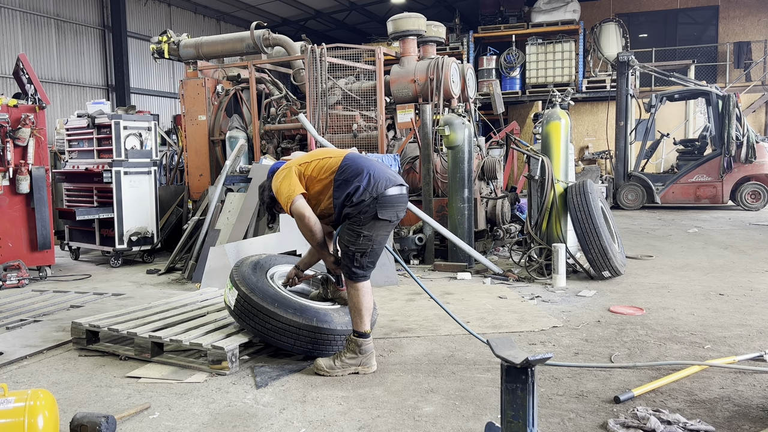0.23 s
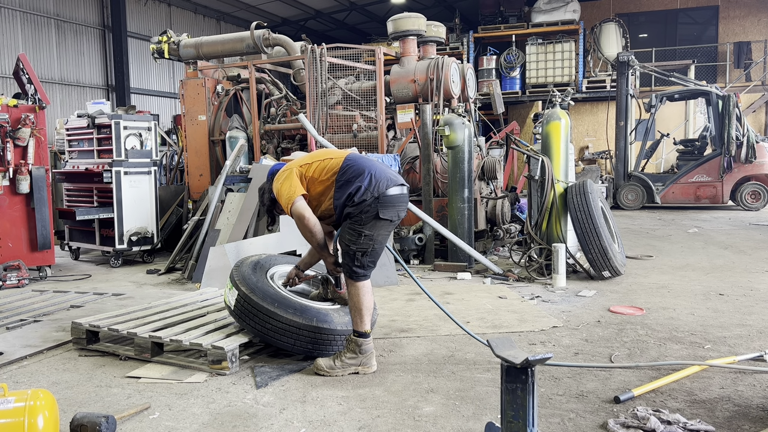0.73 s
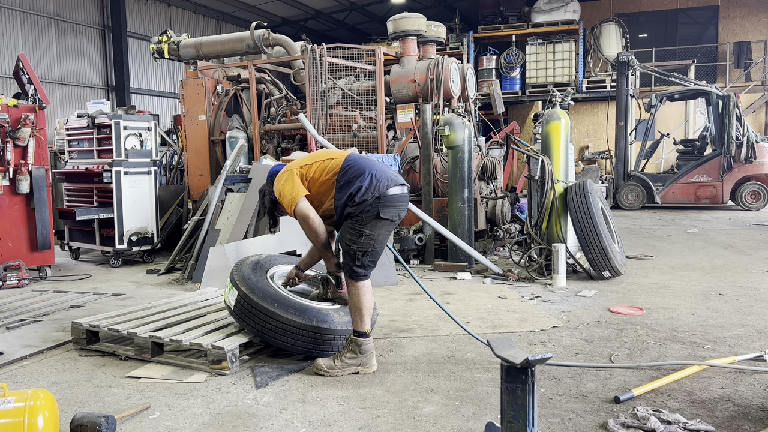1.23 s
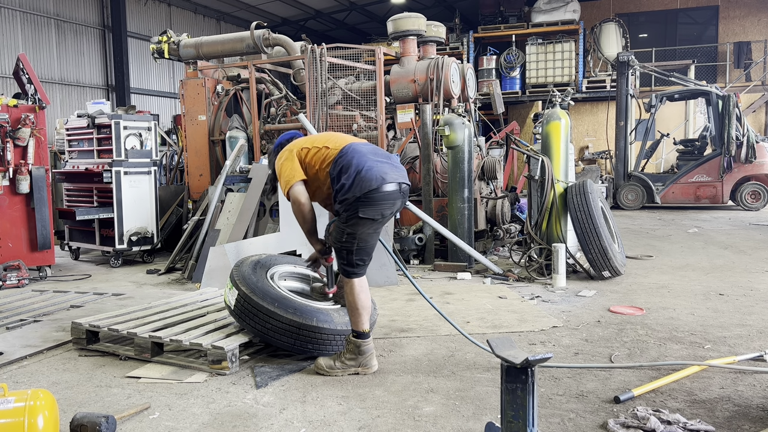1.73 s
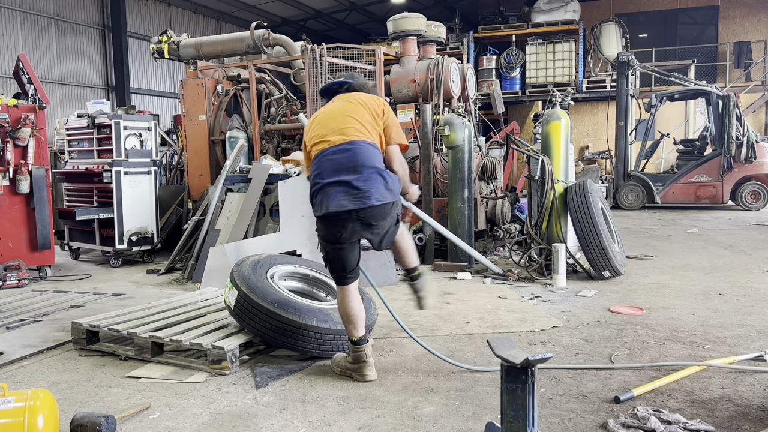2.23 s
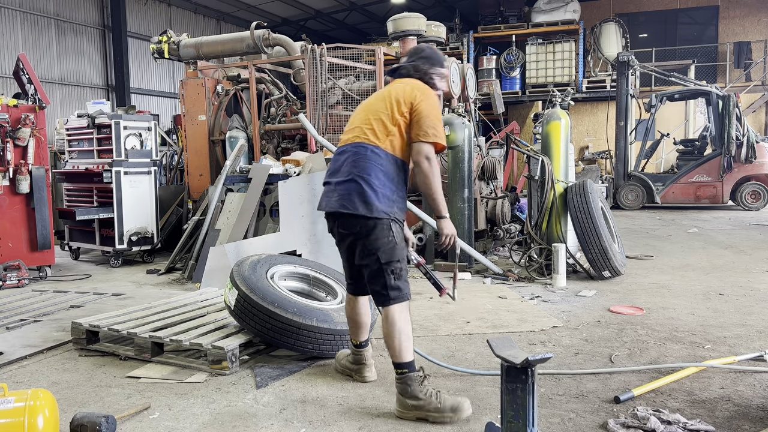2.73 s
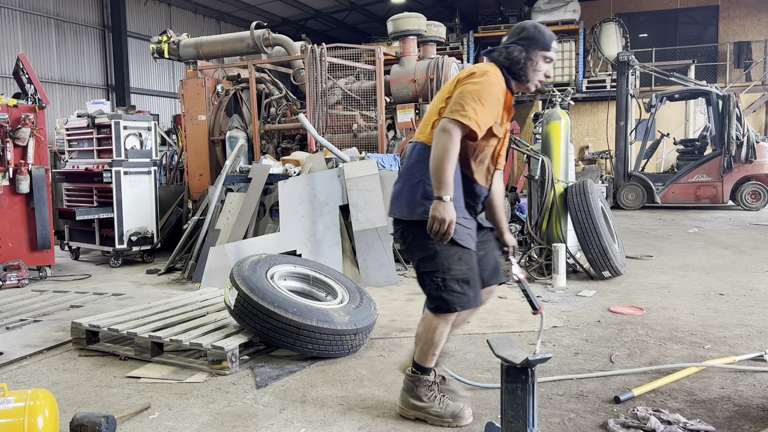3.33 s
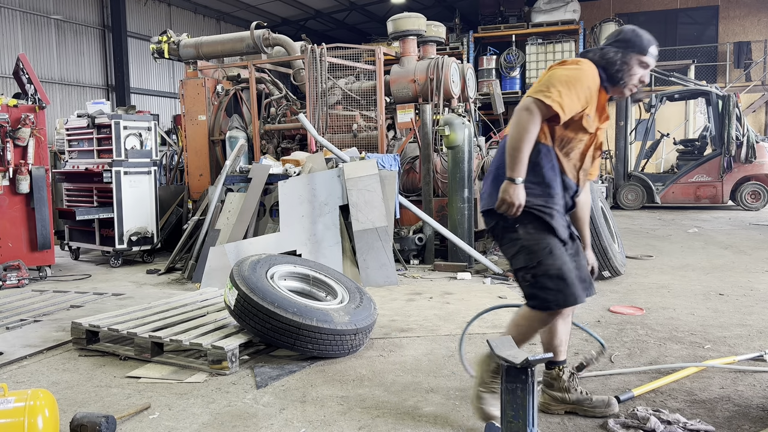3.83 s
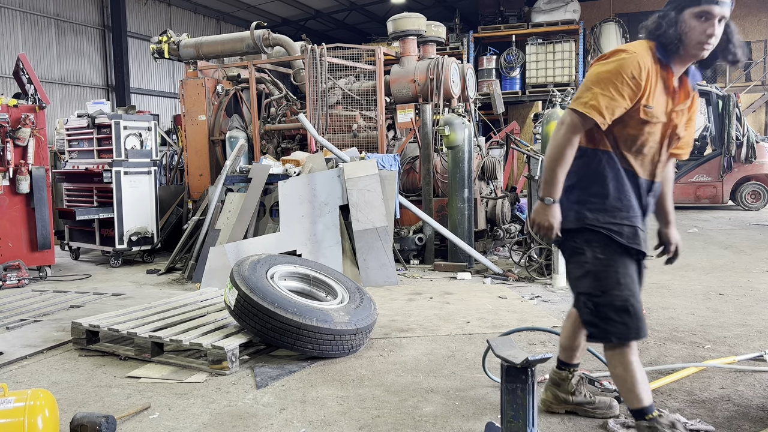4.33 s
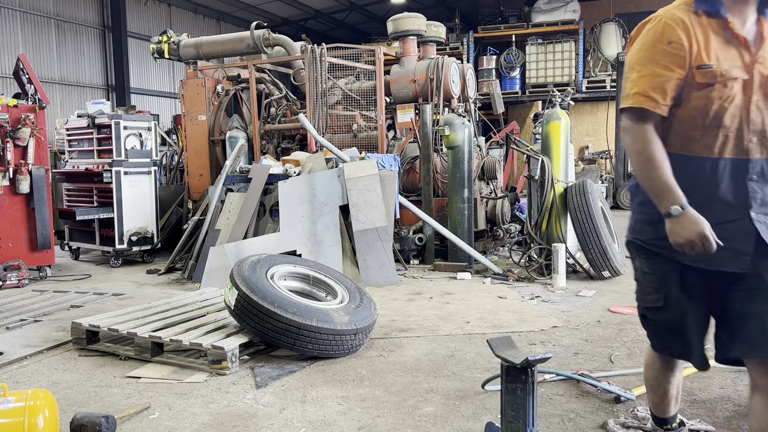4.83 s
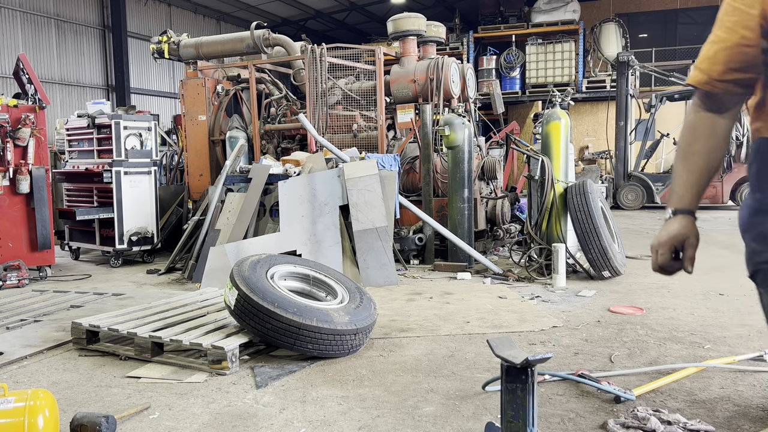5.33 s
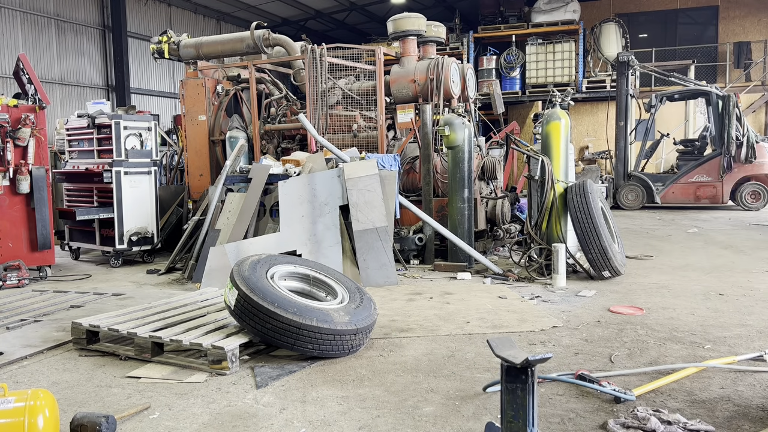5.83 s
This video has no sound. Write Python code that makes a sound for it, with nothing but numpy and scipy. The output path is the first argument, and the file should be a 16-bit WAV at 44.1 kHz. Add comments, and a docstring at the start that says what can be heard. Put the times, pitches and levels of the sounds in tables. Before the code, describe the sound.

An air chuck spits and clicks on a truck tyre, the bead bangs, then an inflator clacks down and gritty boots approach in an echoing workshop.

```python
"""A thin, steady hum comes first, coloured noise that abruptly turns deeper and wider after a second.
Over it an air chuck ticks, spits and whistles on a tyre valve: short noise bursts through resonances.
The tyre bead bangs onto its steel rim: noise and damped modes. Boots approach on gritty concrete:
sagging thuds and grainy noise. An inflator clacks on the floor, fittings rattle, soles scuff, and a
steel tool rings in beating modes. A diffuse hall tail answers all but the hum and the steady valve flow."""
import sys
import numpy as np
from scipy import signal
from scipy.fft import rfft, irfft, next_fast_len
from scipy.io import wavfile
from scipy.ndimage import uniform_filter1d

SR = 44100
rng = np.random.default_rng(int(sys.argv[2]) if len(sys.argv) > 2 else 0)


def put_to_file(sound):
    """Save the sound as 16-bit audio at rate SR, in the file named by the first command-line argument."""
    columns = np.atleast_2d(sound).T  # one column per channel
    safe = np.clip(columns, -1, 1)
    whole_steps = np.round(safe * 32767)
    wavfile.write(sys.argv[1], SR, whole_steps.astype(np.int16))


N = 267907
T = np.arange(3 * SR // 2) / SR  # time axis of one event [s]

# Spectrum levels are relative: noise and bursts are normalised after shaping.
# background before and after the opening: (frequency [Hz], level [dB])
HUM_THIN_SPECTRUM = [(20, -45), (60, -20), (115, 1), (250, -9), (500, -18.5), (1000, -28.5), (2300, -31),
                     (4800, -48.5), (8000, -42.5), (16000, -47)]
HUM_DEEP_SPECTRUM = [(20, -6), (40, -12.5), (62, 3.5), (130, -5), (250, -14), (500, -24), (1000, -24),
                     (2000, -34), (4500, -38), (8000, -42), (16000, -38.5)]
HUM_THIN_DB, HUM_DEEP_DB = -50, -49.5
OPEN_S, OPEN_RAMP_S = 1.03, 0.0068  # when the sound deepens and widens

# left-right likeness before and after the opening, clipped to +-1: (frequency [Hz], likeness [1])
NARROW_LIKENESS = [(100, 1), (1000, 0.59), (4000, 0.16), (8000, 0.3), (14000, .9)]
WIDE_LIKENESS = [(100, 0.95), (280, 0.79), (550, 0.54), (1100, 0.062), (2500, 0.46), (5000, 0.31),
                 (7300, 0.76), (8700, -0.27), (9500, -1.09), (10500, -0.94), (11500, 0.12), (12800, .97),
                 (15000, -0.93)]
# workshop reverberation: (frequency [Hz], t60 [s])
HALL_DECAY = [(100, 0.41), (400, 1.29), (1200, 1.085), (4000, 1.11), (8000, 0.76), (15000, 0.38)]
BAND_LIMIT_HZ = 16200

# small brass contacts of chuck and hose: (time [s], level [dB], brightness [0-1], t60 [s])
TICK_EVENTS = [(.203, -43, 1, 0.0078), (.856, -38, 0.75, 0.012), (.943, -31.5, 0.78, 0.028),
               (1.017, -33.5, 0.99, 0.0079), (1.109, -23, 0.28, 0.015), (1.248, -29, 0.1, 0.016),
               (2.116, -48, 0.5, 0.35), (3.58, -35.5, 0.06, 0.014), (3.633, -37.5, 0.3, 0.033),
               (3.774, -31, 0.48, 0.006), (3.887, -42.5, 0.77, 0.038), (4.879, -17.5, 0.36, 0.0073)]
# bright metal click: (frequency [Hz], level [dB])
BRIGHT_SPECTRUM = [(1000, -4), (5000, -10), (8700, 10), (11000, 2), (16000, -11.5)]
# valve body: (frequency [Hz], level [dB])
VALVE_SPECTRUM = [(500, -6), (3000, -5.5), (4000, 6.5), (4700, 12.5), (5700, -2.5), (6600, 3.5), (8500, -5),
                  (15000, -8.5)]
TICK_ROOM_DB = -8.5
# faint rattle of the hose fittings while carried
RATTLE_FROM_S, RATTLE_TO_S, RATTLE_T60_S = 2.66, 3.8, 0.025
RATTLE_DB, RATTLE_SPREAD_DB = -50, 2.5

# air spitting from the chuck: (time [s], hiss [dB], puff [dB], t60 shared by hiss and puff [s])
SPIT_EVENTS = [(.524, -13.5, -19, 0.028), (.531, -24.5, -36.5, 0.48), (0.586, -23, -30, 0.11)]
# hiss of the jet: (frequency [Hz], level [dB])
JET_SPECTRUM = [(300, -48), (1200, -30), (2900, -8), (3900, -0.5), (5500, 2), (6800, 2.5), (8400, 6.5),
                (11000, 0), (16000, -6.5)]
# whistling in the chuck: (frequency [Hz], width [Hz], level [dB])
JET_RESONANCES = [(6120, 50, 11), (6795, 50, 11), (7130, 140, 7), (8310, 70, 7), (8515, 50, 7),
                  (9735, 50, 7), (12940, 60, 8)]
# low puff: (frequency [Hz], level [dB])
PUFF_SPECTRUM = [(40, -35), (120, -6.5), (350, 2.5), (580, 1.5), (850, -5.5), (2200, -7.5), (5000, -20)]
# air through the valve, before flutter: (time [s], level [dB])
FLOW_ENVELOPE = [(1.015, -54.5), (1.059, -58), (1.2, -57), (1.391, -57.5), (1.42, -80)]
FLUTTER_DB = 1.5  # spread of the wavering

# bead snaps on, then the rubber settles:
# (time [s], ring [dB], crack [dB], rise [s], crack t60 [s], room [dB])
BEAD_EVENTS = [(1.406, -27, -9.5, 0.0036, 0.029, 1.5), (1.7, -60, -32, 0.045, 0.3, -2)]
# lowest rim modes: (frequency [Hz], level [dB], t60 [s])
RIM_MODES = [(95, -2.5, 0.12), (246, 2, 0.11), (271, -3, 0.18), (443.6, -3, 0.13), (858, 3.5, 0.077)]
# crack of the bead: (frequency [Hz], level [dB])
CRACK_SPECTRUM = [(40, -11.5), (110, 3.5), (260, 2), (500, 3.5), (900, -1.5), (1400, -1.5), (2300, -10),
                  (5000, -10.5), (9000, -14), (16000, -17.5)]
# steel rim under the rubber: (frequency [Hz], width [Hz], level [dB])
RIM_RESONANCES = [(250, 60, 4), (450, 70, 2), (670, 60, 3), (852, 60, 5), (1001, 50, 5), (1270, 110, 5),
                  (3004, 60, 7), (3978, 60, 7), (4500, 120, 6), (5470, 80, 7), (7750, 120, 7)]

# boots on concrete: (time [s], heel [dB], settled heel pitch [Hz], grit [dB], forefoot [dB])
STEP_EVENTS = [(2.641, -35, 99.8, -48, -54.5), (3.487, -40.5, 103, -42.5, -51),
               (3.928, -28, 125, -36, -44.5), (4.677, -48.5, 168, -64, -53),
               (4.857, -36, 87.6, -40.5, -50.5), (5.375, -33.5, 88, -27, -29),
               (6.058, -39, 185, -56.5, -47)]
# light boot taps and short cracks of grit underfoot:
# (time [s], level [dB], settled pitch [Hz], grit [dB])
TAP_EVENTS = [(3.745, -46, 128, -36.5), (4.8539, -43, 133, -16.5), (4.982, -40.5, 136, -53),
              (5.595, -35, 106, -56), (5.987, -78, 130.4, -44)]
# slap of the sole: (frequency [Hz], level [dB])
SOLE_SPECTRUM = [(40, -6.5), (140, -3.5), (420, -3.5), (800, -13), (1600, -42.5), (4000, -31),
                 (12000, -40.5)]
# crushed grit: (frequency [Hz], level [dB])
GRIT_SPECTRUM = [(300, -1), (900, 0.5), (1600, 2.5), (2700, -1), (3500, -3.5), (5000, -3.5), (7000, -13.5),
                 (16000, -17)]
# distance of the walker: (time [s], distance [m])
WALKER_DISTANCE = [(2.6, 7.9), (3.5, 5.1), (4.8, 2.77), (6, 0.84)]
ROOM_AT_1M_DB = -12
THUD_ROOM_DB = -7.5  # the low thud wakes the hall less than the grit does
HEEL_PRESS_S, TAP_PRESS_S = 0.031, 0.0086
SAG_RATIO, SAG_S = 2.17, 0.0105  # a thud starts high by this share of its settled pitch
SLAP_DB, SLAP_T60_S = -5, 0.11  # relative to the thud's note
GRIT_T60_S, TAP_GRIT_T60_S = 0.18, 0.0067
ROLL_S, HOLLOW_HZ, HOLLOW_T60_S = 0.024, 371, 0.18  # forefoot follows the heel with a hollow note
FOREFOOT_SLAP_DB = -4  # relative to the hollow note
TOE_S, TOE_DB, TOE_T60_S = 0.034, -4.5, 0.098  # toe crushes the grit again, relative to the first crush

# inflator and hose clack on the floor: (time [s], level [dB], t60 [s], room [dB], ping [dB])
CLACK_EVENTS = [(2.9537, -31, 0.0053, 11.5, -56), (2.959, -15, 0.0089, -0.5, -14.5)]
# clack: (frequency [Hz], level [dB])
CLACK_SPECTRUM = [(80, -15), (320, 10), (650, 3), (1000, 0.5), (1900, 1), (3000, -3.5), (4500, -3),
                  (7000, -7.5), (16000, -6.5)]
# inflator body: (frequency [Hz], width [Hz], level [dB])
INFLATOR_RESONANCES = [(1080, 200, 5), (1280, 120, 4), (1560, 150, 5), (3520, 1000, 7)]
# brief ring of the nozzle: (frequency [Hz], level [dB], t60 [s])
NOZZLE_MODES = [(1180, 0, 0.012), (1480, -8, 0.02), (3370, -2.5, 0.0067), (3590, 3, 0.0096)]

# soles dragged over grit: (time [s], length [s], rub [dB], grit [dB])
SCUFF_EVENTS = [(3.485, 0.076, -46, -51), (3.58, 0.085, -53.5, -51), (4.844, 0.013, -54, -38.5),
                (4.868, 0.029, -44.5, -38.5), (6.051, 0.027, -48.5, -44)]
# rubbing rubber: (frequency [Hz], level [dB])
RUB_SPECTRUM = [(100, -20), (300, -14), (550, -10.5), (850, -13), (1300, -66.5), (5000, -39)]
# rolling sand: (frequency [Hz], level [dB])
SAND_SPECTRUM = [(500, -1), (1300, -1), (2200, -2), (5500, -8), (8000, -7), (16000, -18)]

# steel tool struck and free, later knocked while held: (time [s], ring [dB], knock [dB], click [dB],
# share of free t60 [1], contact cut-off [Hz], room [dB])
CLANG_EVENTS = [(3.932, -31, -25.5, -32, 0.4, 12000, 2), (4.637, -22, -57, -37, 0.021, 1560, -7.5)]
# modes of the steel tool: (frequency [Hz], level [dB], free t60 [s])
STEEL_MODES = [(990, -4, .13), (1573, .5, .66), (2313, -2, .62), (3166, -3.5, .48), (3777, -9, .2),
               (4099, -.5, .5), (4883, -11, .18), (7381, -16, .25)]
# knock: (frequency [Hz], level [dB])
KNOCK_SPECTRUM = [(80, -19), (200, -30), (450, 9), (800, 2.5), (1400, 4.5), (2700, -3.5), (4200, 3.5),
                  (5500, 3.5), (7000, -10), (16000, -12)]
# knock resonances: (frequency [Hz], width [Hz], level [dB])
KNOCK_RESONANCES = [(293, 38, 6), (999, 92, 6.5)]


def amp(db):
    """Decibels to gain."""
    return 10 ** (np.asarray(db) / 20)


def along(points, hz):
    """Interpolate (frequency, value) points on a log frequency axis."""
    point_hz, value = np.transpose(points)
    return np.interp(np.log(hz + 1), np.log(point_hz + 1), value)


def filtered(x, response):
    """x shaped by a response that is a function of frequency."""
    size = next_fast_len(x.shape[-1] + 4096)
    spectrum = rfft(x, size) * response(np.fft.rfftfreq(size, 1 / SR))
    return irfft(spectrum, size)[..., :x.shape[-1]]


def noise(spectrum, size):
    """Coloured stereo noise of rms 1."""
    white = rng.standard_normal((2, size))
    x = filtered(white, lambda hz: amp(along(spectrum, hz)))
    return x / np.sqrt(np.mean(x ** 2))


def opening():
    """Goes from 0 to 1 as the sound deepens and widens."""
    return np.clip((np.arange(N) / SR - OPEN_S) / OPEN_RAMP_S + 0.5, 0, 1)


def hum():
    """Rumble of distant machinery: steady coloured noise, thin and then deep."""
    deep = opening()
    thin_hum = amp(HUM_THIN_DB) * noise(HUM_THIN_SPECTRUM, N)
    deep_hum = amp(HUM_DEEP_DB) * noise(HUM_DEEP_SPECTRUM, N)
    return (1 - deep) * thin_hum + deep * deep_hum


def fade(t60, rise):
    """A quick rise (time constant) and an exponential decay, both in seconds."""
    decay = amp(-60 * T / max(t60, 0.002))
    return decay * (1 - np.exp(-T / max(rise, 1e-5)))


def causal(gain):
    """Minimum-phase response: this magnitude at rms 1, ringing only after it is struck."""
    cepstrum = irfft(np.log(gain / np.sqrt(np.mean(gain ** 2))))
    half = len(cepstrum) // 2
    folded = np.r_[cepstrum[0], 2 * cepstrum[1:half]]
    return np.exp(rfft(folded, len(cepstrum)))


def burst(spectrum, t60, rise, resonances=()):
    """Dying noise, its spectrum evened out, through a body of given spectrum and resonances."""
    z = rfft(rng.standard_normal((2, len(T))) * fade(t60, rise))
    power = np.abs(z) ** 2
    smooth_bins = int(5 / max(t60, 0.005)) + 1
    z *= np.sqrt(power.mean() / uniform_filter1d(power, smooth_bins))
    hz = np.fft.rfftfreq(len(T), 1 / SR)
    body_db = along(spectrum, hz)
    for centre, width, db in resonances:
        body_db = body_db + db / (1 + (2 * (hz - centre) / width) ** 2)
    mid, side = irfft(z * causal(amp(body_db))) * (T < 1)
    return np.array([mid + side, mid - side]) / np.sqrt(2)


def ring(modes, rise):
    """Damped modes, each reaching the two microphones a quarter cycle apart."""
    apart = np.array([[0], [np.pi / 2]])
    out = np.zeros((2, len(T)))
    for hz, db, t60 in modes:
        phase = 2 * np.pi * (hz * T + rng.random()) + apart
        out += amp(db) * fade(t60, rise) * np.sin(phase)
    return out


def hall(x, build=0.0045):
    """The workshop's answer: a diffuse tail that builds up, then decays at its own rate in each band."""
    hz, t, z = signal.stft(rng.standard_normal((2, len(T))), SR, nperseg=256)
    decay = amp(-60 * t / along(HALL_DECAY, hz)[:, None]) * (1 - np.exp(-t / build))
    decay /= np.sqrt(np.mean(decay ** 2, axis=1, keepdims=True) * len(T))
    tail = signal.istft(z * decay, SR, nperseg=256)[1]
    return signal.fftconvolve(x, tail, axes=1)[:, :len(T)]


def add(track, s, sound, room_db):
    """Put a sound and its reverberation on the track at time s."""
    echo = hall(sound.sum(axis=0, keepdims=True) / np.sqrt(2))
    part = track[:, round(s * SR):][:, :len(T)]
    part += (sound + amp(room_db) * echo)[:, :part.shape[1]]


def later(sound, s):
    """The sound delayed by s seconds."""
    return np.pad(sound, ((0, 0), (round(s * SR), 0)))[:, :len(T)]


def tick(brightness, t60):
    """One brass contact; a sharper touch moves it from the valve's body to a bright click."""
    bright = np.clip(brightness, 0, 1)
    body = burst(VALVE_SPECTRUM, t60, rise=0.00037)
    click = burst(BRIGHT_SPECTRUM, t60, rise=0.00013)
    return (1 - bright) * body + bright * click


def ticks(count=22):
    """Small brass parts click against the valve, then rattle at random as the hose is carried."""
    out = np.zeros((2, N))
    for s, db, brightness, t60 in TICK_EVENTS:
        add(out, s, amp(db) * tick(brightness, t60), TICK_ROOM_DB)
    rattle = np.zeros((2, len(T)))
    for k, (when, brightness) in enumerate(rng.random((count, 2))):
        delay_s = (RATTLE_TO_S - RATTLE_FROM_S) * (k + when) / count
        db = RATTLE_DB + RATTLE_SPREAD_DB * rng.standard_normal()
        rattle += later(amp(db) * tick(brightness / 2, RATTLE_T60_S), delay_s)
    add(out, RATTLE_FROM_S, rattle, TICK_ROOM_DB)
    return out


def air(count=150):
    """The chuck spits and whistles, then air sings quietly and unevenly through the valve."""
    out = np.zeros((2, N))
    for s, hiss_db, puff_db, t60 in SPIT_EVENTS:
        hiss = amp(hiss_db) * burst(JET_SPECTRUM, t60, rise=0.0022, resonances=JET_RESONANCES)
        puff = amp(puff_db) * burst(PUFF_SPECTRUM, t60, rise=0.00083)
        add(out, s, hiss + puff, room_db=-14.0)
    s, db = np.transpose(FLOW_ENVELOPE)
    flow = np.interp(np.arange(N) / SR, s, amp(db), left=0, right=0)
    waver = np.interp(np.arange(N), np.linspace(0, N, count), rng.standard_normal(count))
    flutter = amp(FLUTTER_DB * waver)
    return out + flutter * flow * noise(VALVE_SPECTRUM, N)


def bead():
    """The bead slaps the rim, whose modes the rubber damps quickly."""
    out = np.zeros((2, N))
    for s, ring_db, crack_db, rise, t60, room_db in BEAD_EVENTS:
        rim = amp(ring_db) * ring(RIM_MODES, rise)
        crack = amp(crack_db) * burst(CRACK_SPECTRUM, t60, rise, RIM_RESONANCES)
        add(out, s, rim + crack, room_db)
    return out


def walker_room_db(s):
    """The nearer the walker, the drier the sound."""
    distance_m = np.interp(s, *np.transpose(WALKER_DISTANCE))
    return ROOM_AT_1M_DB + 20 * np.log10(distance_m)


def thud(hz, press_s):
    """Rubber lands: a low note that sags while the boot presses down, and the slap of the sole."""
    pitch_hz = hz * (1 + SAG_RATIO * np.exp(-T / SAG_S))
    pressure = (1 - np.exp(-T / 0.0012)) * np.exp(-(T / press_s) ** 2)
    note = pressure * np.sin(2 * np.pi * np.cumsum(pitch_hz) / SR)
    return note + amp(SLAP_DB) * burst(SOLE_SPECTRUM, SLAP_T60_S, rise=0.00054)


def grains(rough_db, size):
    """A gain of rms 1 that jumps from grain to grain, each size samples long."""
    levels = rng.standard_normal(len(T) // size + 1)
    gain = amp(rough_db * np.repeat(levels, size)[:len(T)])
    return gain / np.sqrt(np.mean(gain ** 2))


def crunch(t60):
    """Grit crushed under a sole: a noise burst broken into grains."""
    return grains(rough_db=6.0, size=48) * burst(GRIT_SPECTRUM, t60, rise=0.0007)


def boots():
    """Every step rolls from heel to forefoot to toe, among light boot taps and short cracks of grit."""
    out = np.zeros((2, N))
    hollow = np.sin(2 * np.pi * HOLLOW_HZ * T) * fade(HOLLOW_T60_S, rise=0.0013)
    for s, heel_db, heel_hz, grit_db, forefoot_db in STEP_EVENTS:
        slap = amp(FOREFOOT_SLAP_DB) * burst(SOLE_SPECTRUM, t60=0.22, rise=0.0024)
        forefoot = amp(forefoot_db) * (hollow + slap)
        toe = amp(TOE_DB) * later(crunch(TOE_T60_S), TOE_S)
        grit = amp(grit_db) * (crunch(GRIT_T60_S) + toe)
        room_db = walker_room_db(s)
        add(out, s, amp(heel_db) * thud(heel_hz, HEEL_PRESS_S), room_db + THUD_ROOM_DB)
        add(out, s, grit + later(forefoot, ROLL_S), room_db)
    for s, db, hz, grit_db in TAP_EVENTS:
        room_db = walker_room_db(s)
        add(out, s, amp(db) * thud(hz, TAP_PRESS_S), room_db + THUD_ROOM_DB)
        add(out, s, amp(grit_db) * burst(GRIT_SPECTRUM, TAP_GRIT_T60_S, rise=0.00052), room_db)
    return out


def inflator():
    """Hard clacks through the inflator's body set off the hall, with a short ping of the nozzle."""
    out = np.zeros((2, N))
    for s, db, t60, room_db, ping_db in CLACK_EVENTS:
        clack = burst(CLACK_SPECTRUM, t60, rise=0.00027, resonances=INFLATOR_RESONANCES)
        add(out, s, amp(db) * clack, room_db)
        add(out, s, amp(ping_db) * ring(NOZZLE_MODES, rise=0.00062), room_db=-15)
    return out


def scuffs():
    """Rubber rubs in uneven slips while sand rolls under it."""
    out = np.zeros((2, N))
    for s, length_s, rub_db, grit_db in SCUFF_EVENTS:
        stroke = np.sqrt(np.abs(np.sin(np.pi * np.minimum(T / length_s, 1))))
        rub = amp(rub_db) * grains(rough_db=2.5, size=200) * noise(RUB_SPECTRUM, len(T))
        sand = amp(grit_db) * grains(rough_db=4.5, size=90) * noise(SAND_SPECTRUM, len(T))
        add(out, s, stroke * (rub + sand), room_db=-8)
    return out


def tools():
    """Steel modes ring on when free and stop at once when held; a soft contact wakes only the low ones."""
    out = np.zeros((2, N))
    for s, ring_db, knock_db, click_db, free, cut_hz, room_db in CLANG_EVENTS:
        modes = []
        for hz, db, free_t60 in STEEL_MODES:
            contact_loss_db = 10 * np.log10(1 + (hz / cut_hz) ** 10)
            modes.append((hz, db - contact_loss_db, free_t60 * free))
        # a bar that is not quite round has a twin for each mode, and the two beat
        twins = [(hz + rng.uniform(9, 15), db - 5, t60) for hz, db, t60 in modes]
        steel = amp(ring_db) * ring(modes + twins, rise=0.0046)
        knock = burst(KNOCK_SPECTRUM, t60=0.09, rise=0.00085, resonances=KNOCK_RESONANCES)
        click = burst(BRIGHT_SPECTRUM, t60=0.018, rise=0.00034)
        add(out, s, steel + amp(knock_db) * knock + amp(click_db) * click, room_db)
    return out


def scene():
    """All sources, the work a little to the left of the hum."""
    work = ticks() + air() + bead() + boots() + inflator() + scuffs() + tools()
    left_right_db = [[0.6], [-0.6]]
    return hum() + work * amp(left_right_db)


def image(x, alike):
    """Share each frequency between mid and side by its left-right likeness."""
    def likeness(hz):
        """Left-right likeness at each frequency."""
        return np.clip(along(alike, hz), -1, 1)

    mid = filtered((x[0] + x[1]) / 2, lambda hz: np.sqrt(1 + likeness(hz)))
    side = filtered((x[0] - x[1]) / 2, lambda hz: np.sqrt(1 - likeness(hz)))
    return np.array([mid + side, mid - side])


def record(dry):
    """The stereo image widens after a second; a steep low-pass ends the band."""
    wide = opening()
    pair = (1 - wide) * image(dry, NARROW_LIKENESS) + wide * image(dry, WIDE_LIKENESS)
    return filtered(pair, lambda hz: 1 / np.sqrt(1 + (hz / BAND_LIMIT_HZ) ** 120))


dry = scene()
out = record(dry)
put_to_file(out)
```